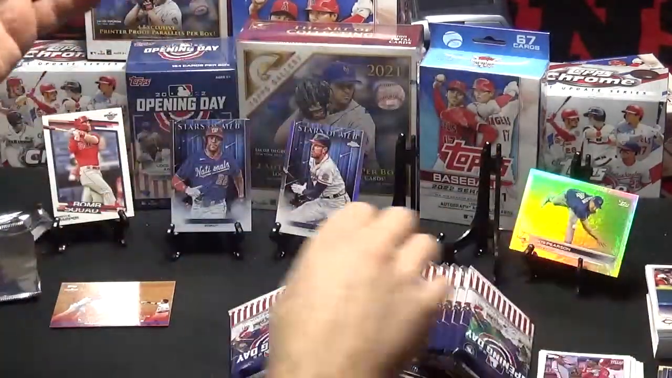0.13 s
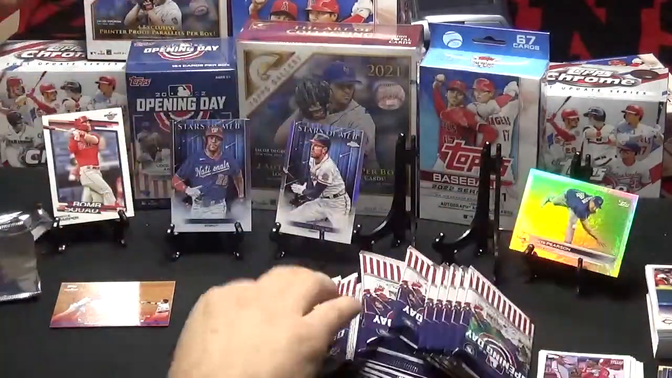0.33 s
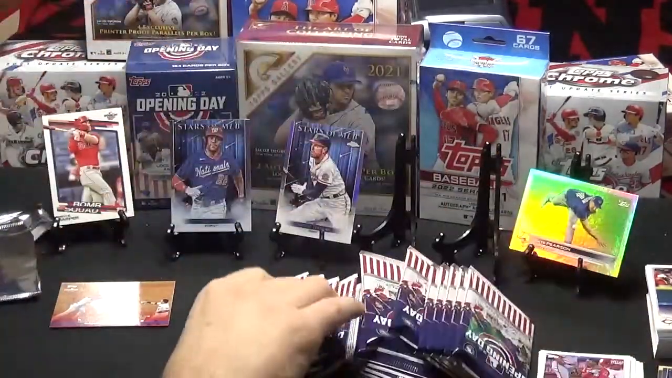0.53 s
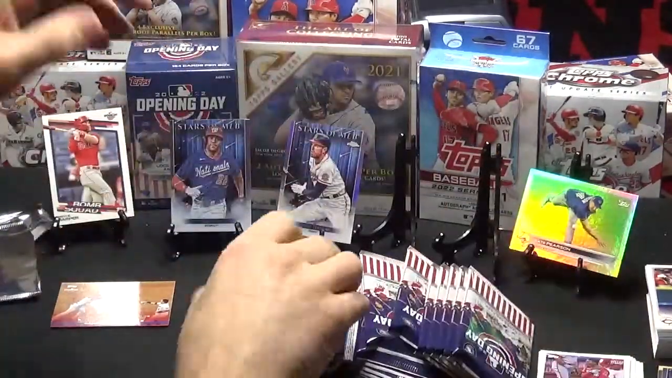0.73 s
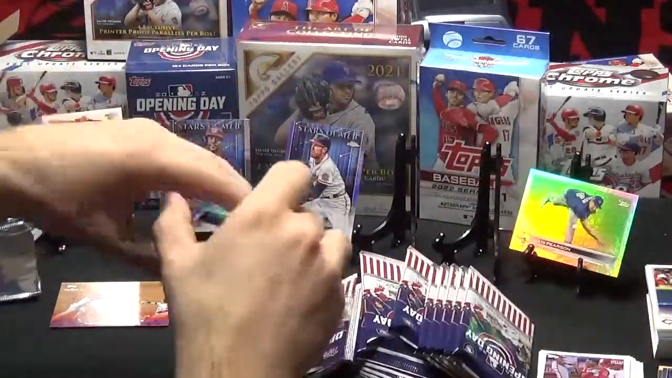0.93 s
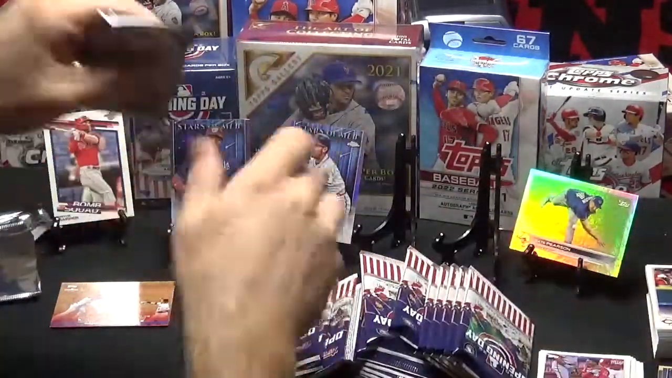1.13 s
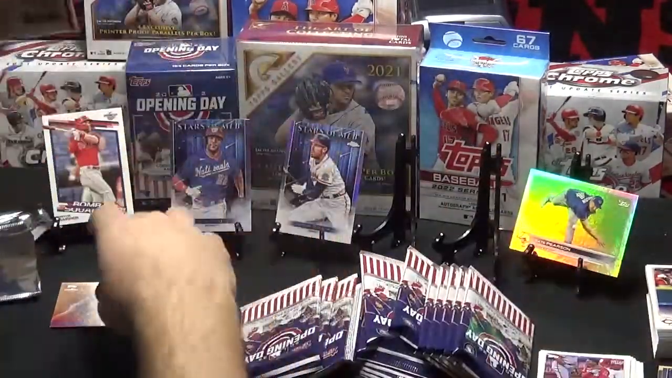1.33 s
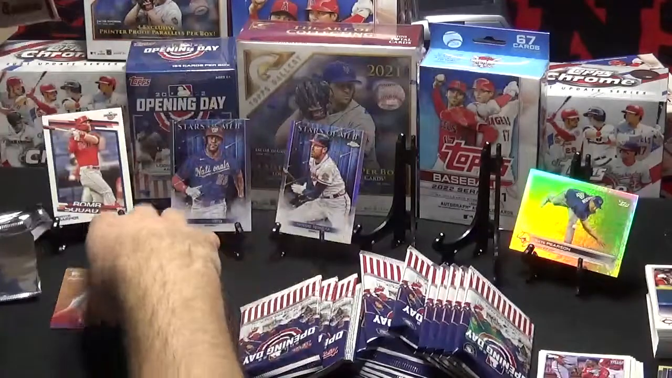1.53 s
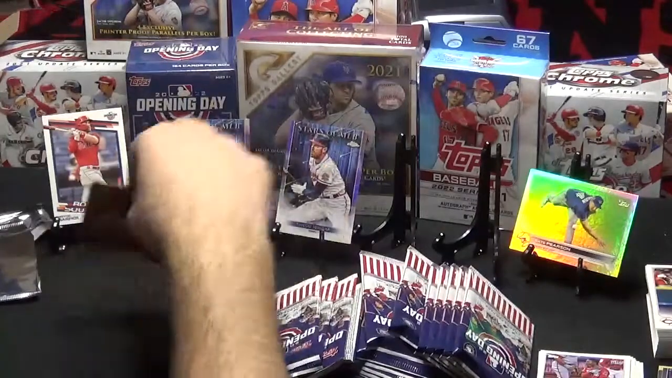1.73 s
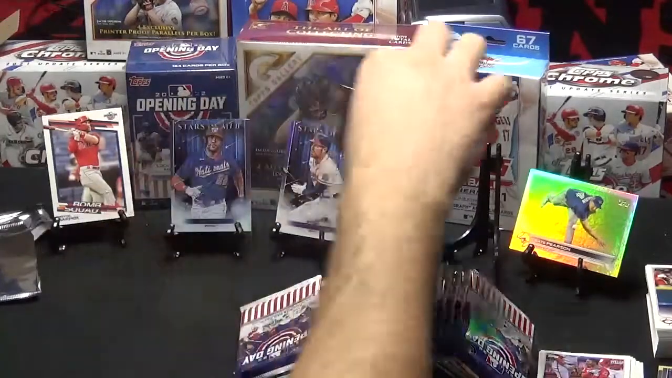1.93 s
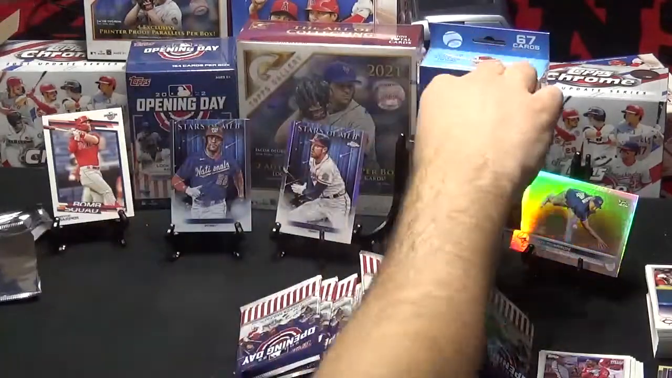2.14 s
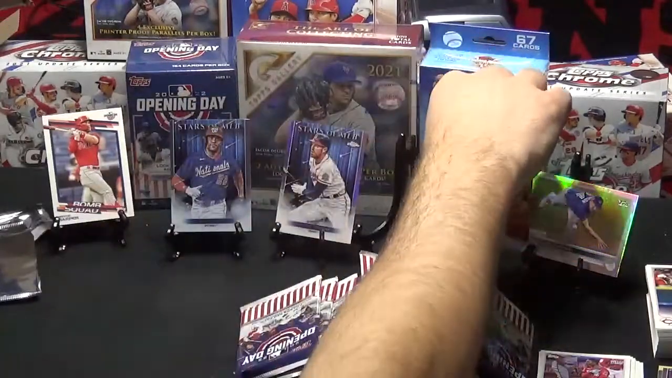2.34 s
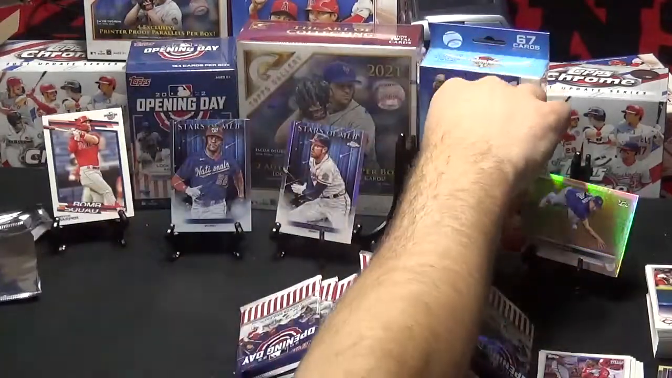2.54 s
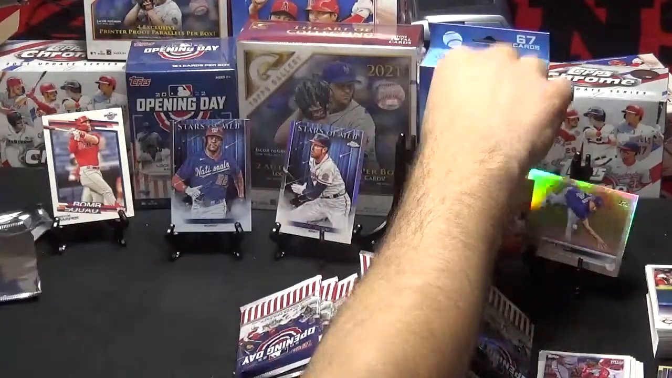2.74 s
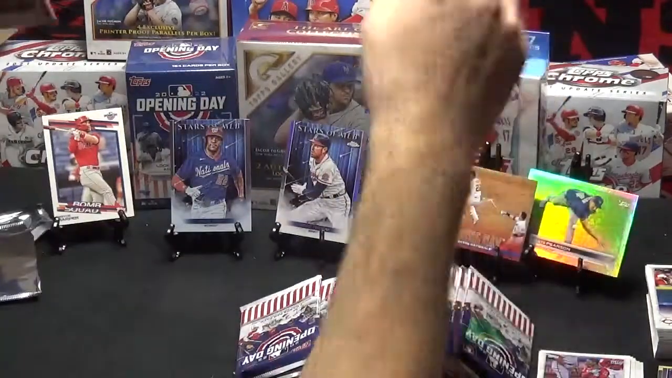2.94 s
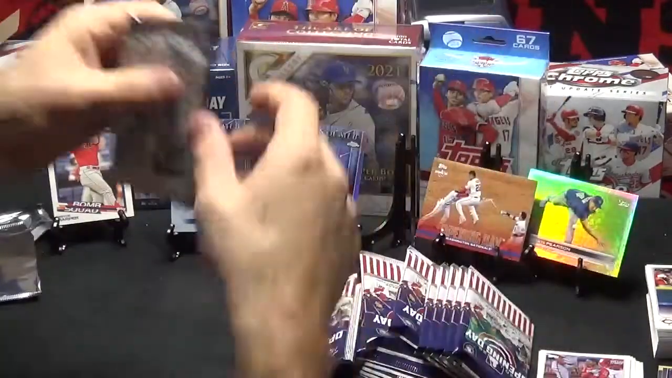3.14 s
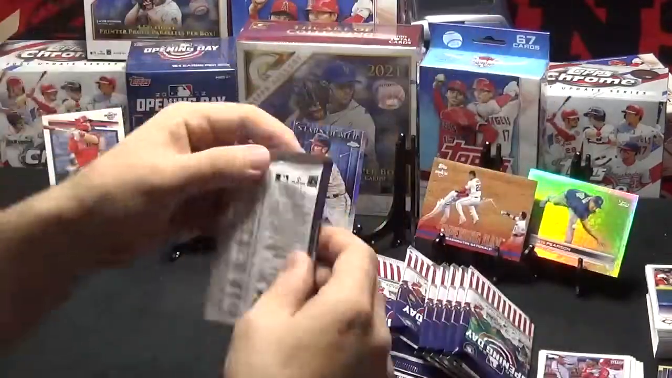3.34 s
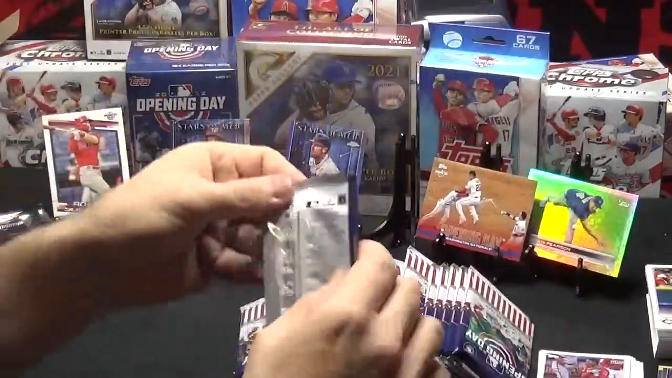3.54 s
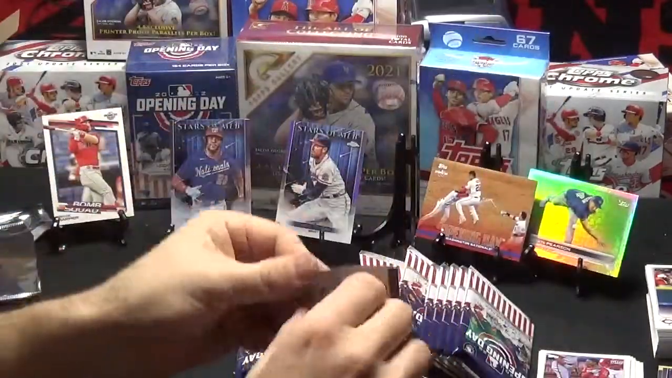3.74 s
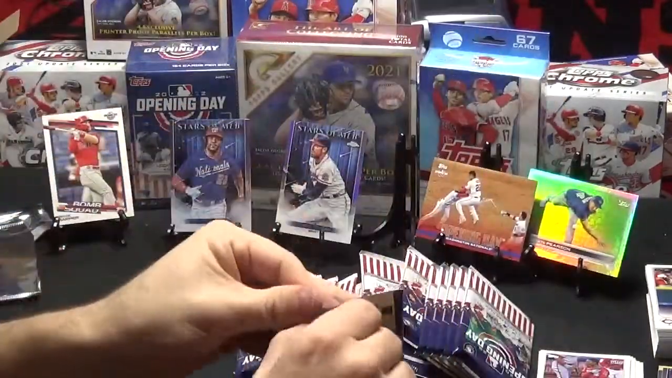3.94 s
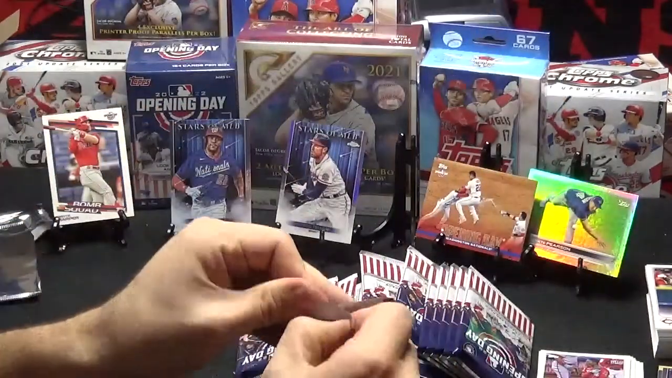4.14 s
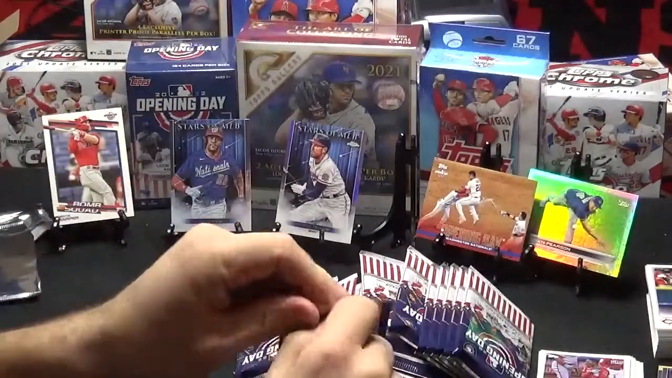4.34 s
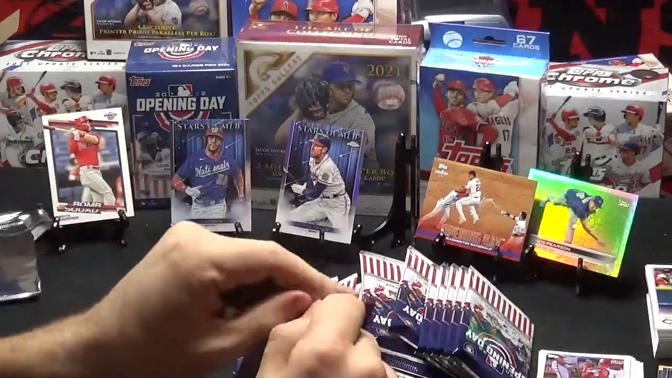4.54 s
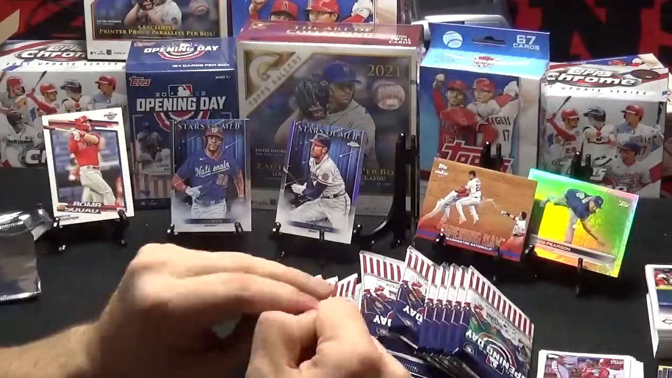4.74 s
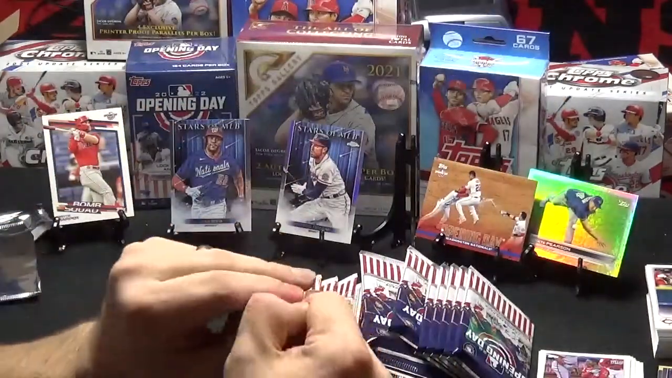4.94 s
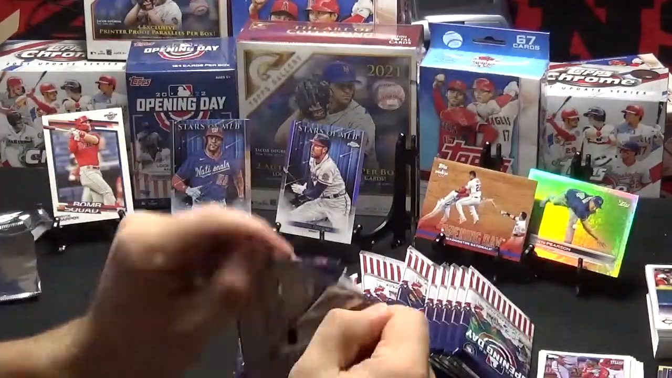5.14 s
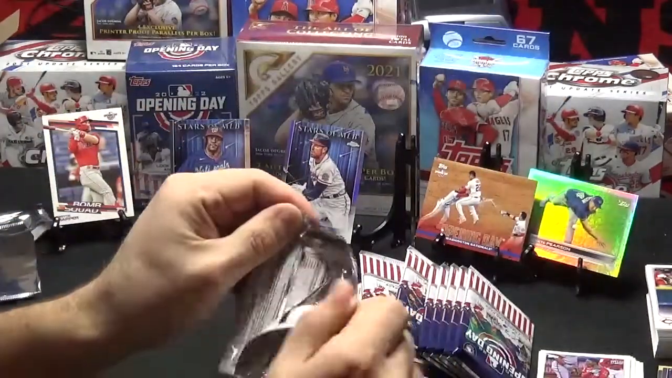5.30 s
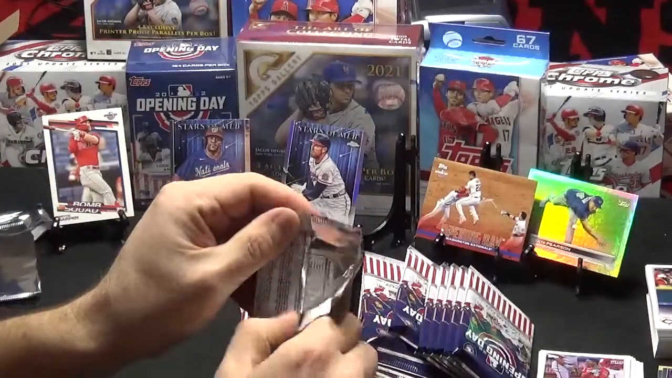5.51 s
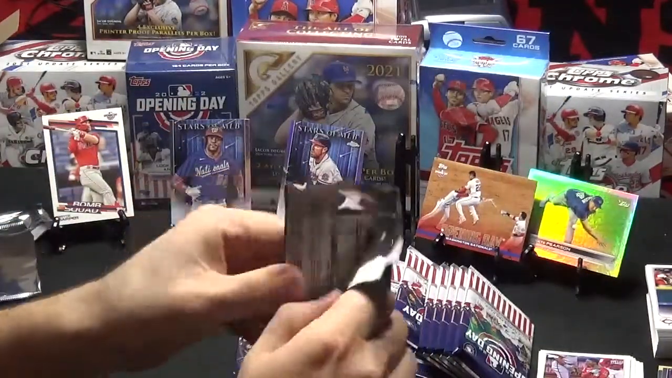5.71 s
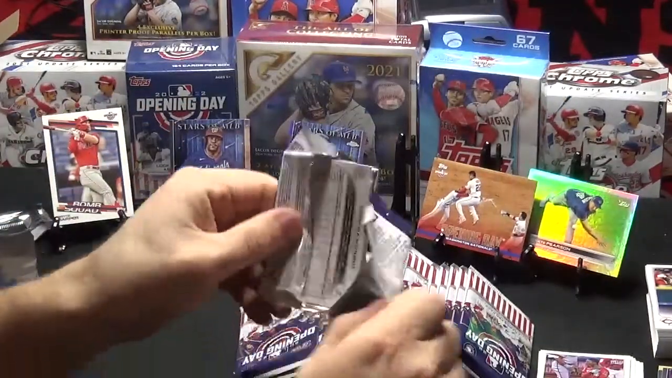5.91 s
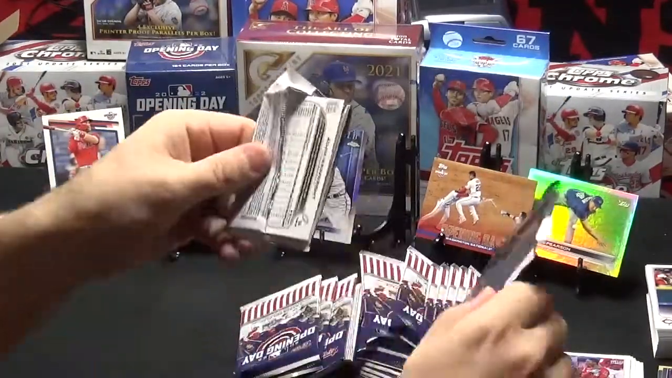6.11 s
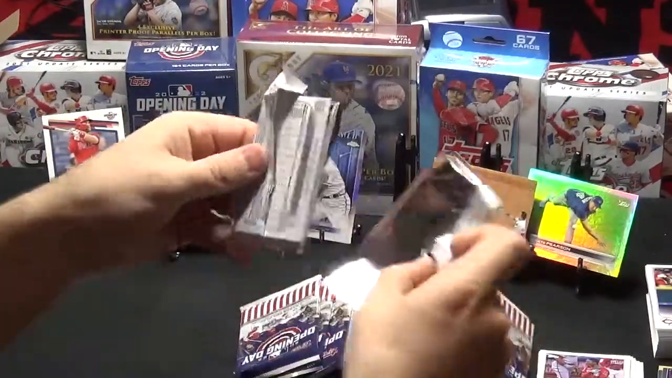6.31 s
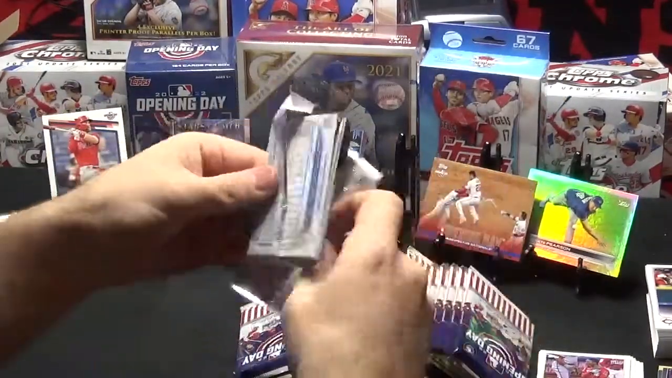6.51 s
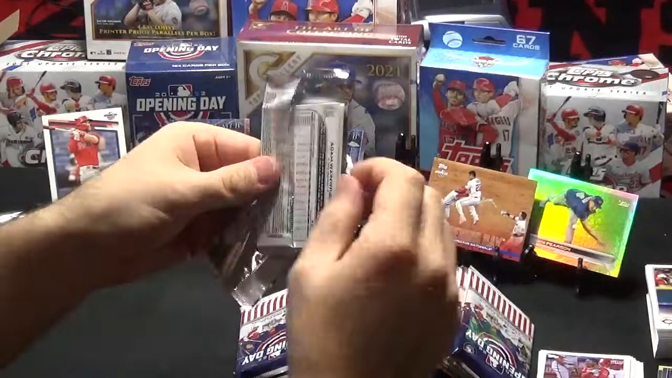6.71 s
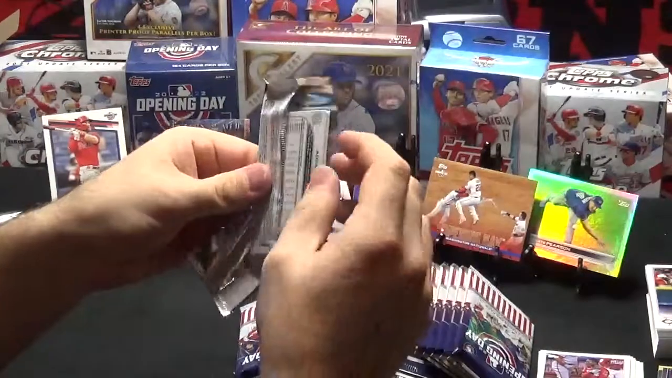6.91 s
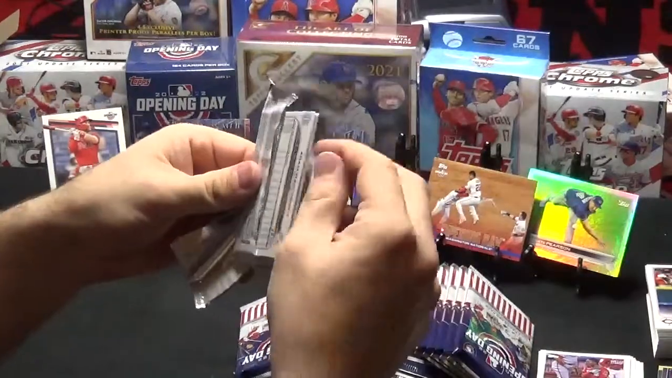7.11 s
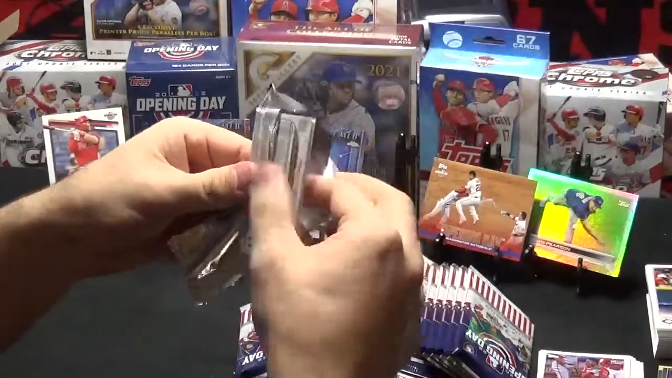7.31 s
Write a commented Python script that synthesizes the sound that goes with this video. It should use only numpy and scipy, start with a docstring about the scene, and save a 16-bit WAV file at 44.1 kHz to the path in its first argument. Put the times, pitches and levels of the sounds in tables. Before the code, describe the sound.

A small room, close microphone, low mains-like hum and soft airy hiss throughout. From 0 to about 3.2 seconds it is quiet: a thin high whine pulses rapidly, pausing around 0.9 to 1.15, with faint rubbing, a small foil snap and card knock near 1.0, and soft taps around 1.7 and 2.6 to 2.8. The whine stops at 3.2 as foil starts to crinkle, with isolated dry snaps to 3.7. From 3.7 to 5.0 crackling is dense, fine and bright, strongest near 4.1, easing around 4.6. At 5.0 to 5.25 the seam rips loudly, its bright edge sliding downward. Looser crinkles follow; at 5.8 to 6.0 the wrapper is stripped in a harsh crackling burst. Afterwards come separate crunches and sharp snaps, with dull card knocks near 6.2, 6.5 and 6.75, continuing to the end around 7.5. Short room reflections follow each snap.

```python
"""Foil card pack in two hands, close to a camera in a small room: picked up, pinched, ripped open, stripped.
Creases buckle in single snaps, made as kicked resonances; rubbing and tearing shed showers of tiny clicks
filtered in bands. Cards knock dully, and the room answers with short tails of decaying noise.
Behind lie shaped noise for air and wavering sines for an appliance; a faint pulsing whine sits near the mic."""
import sys
import numpy as np
from scipy import signal
from scipy.fft import rfft, irfft
from scipy.io import wavfile
from scipy.ndimage import uniform_filter1d

SR = 44100
rng = np.random.default_rng(int(sys.argv[2]) if len(sys.argv) > 2 else 0)


def output_pcm(signal):
    """Save a mono or channel-first signal as 16-bit PCM at the path in sys.argv[1].

    Samples are clipped to [-1, 1] before scaling.
    """
    pcm = np.clip(np.atleast_2d(signal).T, -1, 1) * 32767
    wavfile.write(sys.argv[1], SR, np.round(pcm).astype(np.int16))


N = 328986
TOP_HZ = 11020  # upper edge of what the camera keeps


def undb(db):
    """Decibels to gain."""
    return 10 ** (np.asarray(db) / 20)


def unit(x):
    """Scale to rms 1."""
    return x / np.sqrt(np.mean(x ** 2) + 1e-20)


def band(x, lo_hz, hi_hz, order=2):
    """Causal band-pass."""
    edges = [lo_hz, min(hi_hz, SR / 2 - 100)]
    sos = signal.butter(order, edges, "band", fs=SR, output="sos")
    return signal.sosfilt(sos, x + 1e-18)


def colour(points, hz):
    """Gain of a (f/Hz, level/dB) spectrum at the given frequencies."""
    f, db = np.transpose(points)
    return undb(np.interp(np.log(hz + 1), np.log(f), db))


def walk(rate):
    """Random drift around zero with rate knots a second, smoothed over 50 ms."""
    knots = rng.standard_normal(400)
    drift = np.interp(np.arange(N) / SR * rate, np.arange(len(knots)), knots)
    return uniform_filter1d(drift, SR // 20)


def curves(table):
    """The columns of a timed table, one value per sample; the end rows hold outside it."""
    s, *columns = np.transpose(table)
    return [np.interp(np.arange(N) / SR, s, c) for c in columns]


def add(out, s, sound):
    """Mix a sound in at a time."""
    i = int(np.clip(s * SR, 0, N - 1))
    out[i:i + len(sound)] += sound[:N - i]


def air(side_hz=900, side_share=0.93, level_db=-57):
    """Steady ventilation and hiss: shaped noise whose deep bass is nearly alike on both sides."""
    # density of the background air before overall scaling: f/Hz, level/dB per Hz
    air_points = [(20, -22), (35, -10), (55, -5.5), (95, 4), (150, 0.5), (200, 0.5), (300, -8.5),
                  (600, -12.5), (1200, -16.5), (2500, -17), (5000, -21), (11000, -24.5)]
    hz = np.fft.rfftfreq(N, 1 / SR)
    mid, side = rfft(rng.standard_normal((2, N))) * colour(air_points, hz)
    side = side * side_share * np.sqrt(hz / (hz + side_hz))
    left_right = irfft(np.array([mid + side, mid - side]), N)
    return undb(level_db) * unit(left_right)


def hum(waver_rate=5, lift_db=3):
    """Wavering motor and mains hum, heard a little louder as the gain on it is raised from 3 to 5 s."""
    # shaft, mains and casing lines: f/Hz, level/dB rms before the gain is raised, waver share
    hum_lines = [(30.2, -64, 0.25), (37.8, -74, .3), (83.5, -76.5, 1), (88, -65, 0.43), (120, -49.5, 0.067),
                 (202.5, -57.5, 0.37), (242, -88, 0.15)]
    t = np.arange(N) / SR
    out = 0
    for hz, db, waver in hum_lines:
        drift = 1 + waver * (walk(waver_rate) + 1j * walk(waver_rate))
        phasor = drift * np.exp(2j * np.pi * (hz * t + rng.random()))
        out = out + undb(db) * unit(phasor.real)
    return out * undb(lift_db * np.interp(t, [3.0, 5.0], [0, 1]))


def whine(pulse_s=0.0024, uneven_db=2.0, waver_rad=0.77):
    """Thin, slightly uneven pips at a fixed rate, like a small lens motor stepping near the mic."""
    # stretches of whine: start t/s, end t/s, f/Hz, pulses a second, level/dB rms of the ungated pip train
    whine_runs = [(0.014, .86, 3400, 30, -68.5), (0.014, .86, 2590, 30, -73.5), (1.151, 2.5, 2590, 30, -68),
                  (1.181, 3.2, 3450, 15, -76.5), (2.518, 3.15, 2590, 30, -78)]
    t = np.arange(N) / SR
    out = np.zeros(N)
    for start, end, hz, rate, db in whine_runs:
        from_pip = ((t - start) * rate + .5) % 1 - .5  # distance in pulse periods
        envelope = np.exp(-.5 * (from_pip / rate / pulse_s) ** 2)
        pips = envelope * np.sin(2 * np.pi * hz * t + waver_rad * walk(30.7))
        sounding = (t > start - 2 * pulse_s) * (t < end)
        out += undb(db) * unit(pips * undb(uneven_db * walk(11.77))) * sounding
    return out


def hands(push_range_db=20.5, grip_db_per_s=4000, let_go_db_per_s=900):
    """Work on the foil, its free flexing and fineness of creases, in dB; the strongest push or pull leads."""
    # finger pushes: hardest moment t/s, swell/s, fade/s, crackle level/dB,
    # finest creases against mid-sized facets level/dB
    finger_pushes = [(.414, .02, 0.29, -56.5, 7), (.58, 0.23, 0.15, -57, 10), (1.008, .007, .04, -41, 5.5),
                     (1.696, 0.063, 0.062, -52, -3), (3.22, 0.33, 0.32, -53, 2),
                     (3.39, 0.24, 0.26, -50.5, 5), (3.467, .02, 0.023, -39, 3),
                     (3.655, 0.12, 0.067, -47.5, 3), (3.742, 0.01, 0.043, -30.5, 5.5),
                     (3.905, 0.049, 0.043, -32.5, 24), (3.999, 0.038, 0.055, -25, 10.5),
                     (4.096, 0.046, 0.041, -20, 10.5), (4.193, .14, 0.086, -32.5, 11),
                     (4.25, 0.027, 0.057, -34, 8.5), (4.318, 0.017, 0.18, -31, 6.5),
                     (4.465, .015, 0.074, -36.5, -1), (4.578, 0.026, .06, -44.5, -1),
                     (4.66, 0.084, .13, -46, -9), (4.764, 0.026, .08, -33.5, 5.5),
                     (4.826, 0.011, 0.078, -27.5, 8.5), (4.905, 0.059, 0.16, -29.5, 12),
                     (4.96, .14, 0.051, -31.5, 11.5), (5.365, 0.046, .11, -36, 0),
                     (5.525, 0.0065, 0.19, -37, 5.5), (5.603, 0.043, 0.11, -39.5, -1.5),
                     (5.734, 0.022, 0.062, -35.5, 0), (6.252, 0.015, 0.22, -41.5, -2),
                     (6.29, 0.032, 0.049, -36.5, -5.5), (6.339, .06, 0.063, -42, -9),
                     (6.521, 0.041, 0.12, -33.5, -3.5), (6.568, 0.066, 0.057, -34, -1.5),
                     (6.737, 0.023, 0.043, -38, 1), (6.836, 0.011, 0.046, -38.5, 4),
                     (6.937, 0.017, .09, -36.5, 5.5), (7.144, .13, 0.058, -39.5, -0.5),
                     (7.436, 0.29, 0.039, -39, -1.5)]
    # ripping the seam: t/s, crackle level/dB, finest creases level/dB
    seam_pull = [(5.006, -25.5, 8), (5.042, -15.5, 1), (5.14, -27.5, 3.5), (5.154, -25, 2),
                 (5.198, -33, 3.5), (5.22, -28.5, 5.5), (5.26, -39, 9)]
    # stripping the wrapper: t/s, crackle level/dB, finest creases level/dB
    wrapper_pull = [(5.77, -39, 6), (5.776, -34, 6.3), (5.784, -37, 7.2), (5.79, -30.5, 6.1),
                    (5.902, -22, 2.6), (6.008, -23, 5.3), (6.015, -26.5, 5.7)]
    # slack, little when pinched taut, more when torn open: t/s,
    # whole-sheet flexing against mid-sized facets level/dB
    wrapper_slack = [(.4, -4), (3.4, -7.5), (3.65, -2), (3.75, -16.5), (4.1, -17.5), (4.8, -18),
                     (5.04, -19), (5.09, -13), (5.15, -15), (5.25, 2), (5.37, -7.5), (5.6, -4),
                     (5.82, -17.5), (5.89, -6), (6.02, -10), (6.5, -9.5), (7.45, -11.5)]
    t = np.arange(N) / SR
    work_db, fine_db = np.full(N, -100.), np.zeros(N)
    for s, swell_s, fade_s, db, fine in finger_pushes:
        # a push gains push_range_db over its swell and loses it over its fade
        push_db = db - push_range_db * np.maximum((s - t) / swell_s, (t - s) / fade_s)
        fine_db = np.where(push_db > work_db, fine, fine_db)
        work_db = np.maximum(work_db, push_db)
    for pull in (seam_pull, wrapper_pull):
        db, fine = curves(pull)
        taking_hold = grip_db_per_s * np.maximum(pull[0][0] - t, 0)
        letting_go = let_go_db_per_s * np.maximum(t - pull[-1][0], 0)
        pull_db = db - taking_hold - letting_go
        fine_db = np.where(pull_db > work_db, fine, fine_db)
        work_db = np.maximum(work_db, pull_db)
    return work_db, curves(wrapper_slack)[0], fine_db


def shower(rate, size_db):
    """Random impulses at a moving rate, mostly small, a few large."""
    hits = rng.random(N) < rate / SR
    sizes = hits * undb(size_db * np.minimum(rng.exponential(size=N), 4))
    # dividing by the local rms keeps the shower's loudness even; the work level sets it
    nearby = np.abs(uniform_filter1d(sizes ** 2, SR // 50))
    return sizes / np.sqrt(nearby + rate / SR / 2)


def crackle(work_db, sheet_db, fine_db, clicks_per_s=950, crowding=.55, size_db=3.5, facet_db=4,
            rub_share=0.093, slide_db=-53, flap_octaves=0.18, sheet_hz=1100, fine_hz=5000, count=16):
    """Tiny clicks, denser when the foil is worked harder; each shakes its own mix of large and small facets."""
    # colour of crackling foil: f/Hz, level/dB per Hz
    foil_points = [(250, -6), (450, -7.5), (720, -3), (950, -6.5), (1150, -7), (1550, 3.5), (2300, 2.5),
                   (4200, 3.5), (7000, -2), (11000, 4)]
    # seam rip, the freed flap grows so its resonance falls: t/s, flap f/Hz, emphasis level/dB
    seam_rip = [(4.995, 10000, -6), (5.008, 9200, 9), (5.035, 7760, 9.5), (5.06, 4300, 7.5),
                (5.085, 3030, 6), (5.11, 1720, 11), (5.15, 1670, 3.5), (5.225, 1680, 4.5), (5.27, 1600, -6)]
    flap_hz, flap_db = curves(seam_rip)
    clicks = shower(clicks_per_s * undb(crowding * (work_db + 32)), size_db)
    edges = np.geomspace(250, 11500, count + 1)
    centres = np.sqrt(edges[:-1] * edges[1:])
    # the whole sheet radiates the lows, mid-sized facets the middle, fine creases the top
    sheet = 1 / (1 + (centres / sheet_hz) ** 8)
    fine = 1 / (1 + (fine_hz / centres) ** 6)
    sizes = np.array([sheet, (1 - sheet) * (1 - fine), fine])
    shares = sizes * colour(foil_points, centres) ** 2 * centres
    shares = shares / shares.sum(axis=1, keepdims=True)
    drive = undb([sheet_db, np.zeros(N), fine_db]) ** 2
    # a light touch mostly slides over the foil with a smooth swish; a firm one buckles it
    sliding = np.clip(rub_share + 1 / (1 + undb(work_db - slide_db) ** 2), 0, 1)
    out, power = np.zeros(N), np.zeros(N)
    for lo, hi, hz, share in zip(edges[:-1], edges[1:], centres, shares.T):
        own_sizes = undb(facet_db * rng.uniform(-2, 2, N))
        buckling = unit(clicks * rng.choice([-1, 1], N) * own_sizes)
        push = np.sqrt(1 - sliding) * buckling + np.sqrt(sliding) * rng.standard_normal(N)
        flap = flap_db * np.exp(-.5 * (np.log2(hz / flap_hz) / flap_octaves) ** 2)
        gain = np.sqrt(share @ drive) * undb(flap)
        out += gain * unit(band(push, lo, hi))
        power += gain ** 2
    # dividing by the summed band power leaves the level to the hands
    return undb(work_db) * out / np.sqrt(power)


def click(hz, ring_s, grit, span, broad_db):
    """A kick and a dying rattle through one resonance and as a broad crack; energy of 1 ms at rms 1."""
    t = np.arange(SR // 20) / SR
    rattle = rng.standard_normal(len(t)) * np.exp(-t / (2 * max(ring_s, 1 / SR)))
    push = grit * unit(rattle) + unit(t == 0)
    ring = band(push, hz / (1 + span), min(hz * (1 + span), TOP_HZ))
    crack = band(push, hz / 3, min(hz * 4, TOP_HZ))
    return unit(unit(ring) + undb(broad_db) * unit(crack)) * np.sqrt(SR / 1000 / len(t))


def taps(grit=3.7, span=0.31, broad_db=-3):
    """Light, duller knocks of card and plastic: single kicks through a narrower resonance."""
    # cards against fingers, stands and table: t/s, level/dB as if packed into 1 ms,
    # main resonance f/Hz, ring time/s
    card_knocks = [(0.413, -47, 1470, 0.0051), (1.011, -45, 655, 0.0027), (1.024, -38, 462, 0.0052),
                   (1.667, -41.5, 1900, 0.0019), (1.689, -40.5, 595, 0.0069), (1.713, -54, 1100, 0.0043),
                   (2.579, -51, 3900, 0.0051), (2.585, -53, 1400, .004), (2.655, -49, 1300, 0.0052),
                   (2.793, -41.5, 1170, 0.0014), (2.797, -44.5, 1370, 0.012), (6.19, -36.5, 570, 0.0072),
                   (6.504, -28, 920, 0.0027), (6.522, -29, 960, 0.0045), (6.738, -32.5, 193, 0.0057),
                   (7.0943, -38, 1210, 0.0024)]
    out = np.zeros(N)
    for s, db, hz, ring_s in card_knocks:
        add(out, s, undb(db) * click(hz, ring_s, grit, span, broad_db))
    return out


def snaps(creases, grit=1.78, span=0.77, broad_db=-7, sheet_hz=1300, sheet_span=1.0):
    """Each crease flips over at once, shakes the facet beside it and, more dully, the whole sheet."""
    out = np.zeros(N)
    for s, db, hz, ring_s, sheet_db in creases:
        facet = click(hz, ring_s, grit, span, broad_db)
        sheet = click(sheet_hz, ring_s, grit, sheet_span, broad_db)
        add(out, s, undb(db) * (facet + undb(sheet_db) * sheet))
    return out


def lesser_creases(work_db, sheet_db, count=300, yield_db=-50, per_s=20, over_db=10.5, top_db=-28,
                   scatter_db=5, centre_hz=6400, octaves=0.18, ring_s=0.00032, flex_db=-9.5):
    """Rows for snaps(): creases give way at random above the yield level, stronger under harder work."""
    rows, s = [], 0
    for gap, size, facet in rng.standard_normal((count, 3)):
        s += np.exp(gap / 2) / per_s
        i = int(s * SR)
        if i < N and work_db[i] > yield_db:
            # top_db caps the typical level; the scatter comes on top
            db = min(work_db[i] + over_db, top_db) + scatter_db * size
            hz = centre_hz * 2 ** (octaves * np.clip(facet, -2, 2))
            rows.append((s, db, hz, ring_s, sheet_db[i] + flex_db))
    return rows


def echoes(build_s, count=12, t60_low_s=0.57, t60_high_s=0.25):
    """One dense room tail of unit energy: bands of decaying noise whose treble dies first."""
    t = np.arange(SR // 2) / SR
    edges = np.geomspace(200, 12000, count + 1)
    tail = np.zeros(len(t))
    for lo, hi, t60 in zip(edges[:-1], edges[1:], np.linspace(t60_low_s, t60_high_s, count)):
        fade = np.exp(-np.log(1000) * t / t60) * (1 - np.exp(-t / build_s))
        tail += np.sqrt(hi - lo) * unit(band(rng.standard_normal(len(t)), lo, hi) * fade)
    return tail / np.linalg.norm(tail)


def room(upward, sideways, level_db=-7, side_db=-3, side_low_hz=450, side_top_hz=7000,
         build_s=0.00017, hand_turn=2.09):
    """Table and walls answer; the echo pattern keeps changing as the hands move."""
    one = signal.fftconvolve(upward, echoes(build_s))[:N]
    other = signal.fftconvolve(sideways, echoes(build_s))[:N]
    angle = hand_turn * walk(4)  # radians
    mid = np.cos(angle) * one + np.sin(angle) * other
    # long waves reach both microphone ports alike
    side = np.cos(angle) * other - np.sin(angle) * one
    side = band(side, side_low_hz, side_top_hz, order=1)
    return undb(level_db) * (mid + undb(side_db) * side * np.array([[1], [-1]]))


def limiter(x, threshold_db=-16, release_db_per_s=50, ceiling=.48):
    """Turns both sides down at once when loud, recovers steadily, and rounds spikes that slip through."""
    power = np.abs(uniform_filter1d(np.mean(x ** 2, axis=0), SR // 400))
    over_db = np.maximum(10 * np.log10(power + 1e-12) - threshold_db, 0)
    recovery = release_db_per_s * np.arange(N) / SR
    cut_db = np.maximum.accumulate(over_db + recovery) - recovery
    held = x * undb(-cut_db)
    return held / (1 + (held / ceiling) ** 6) ** (1 / 6)


def scene():
    """Foil and taps in the middle, close to the mic, with the room and background around them."""
    # the loudest buckling creases: t/s, level/dB as if packed into 1 ms, facet centre f/Hz,
    # ring time/s, flexing of the surrounding sheet level/dB against the facet
    loud_creases = [(.488, -40, 7500, .0008, -5), (.973, -45, 4100, .0015, -3.5),
                    (1.011, -25, 6260, 0.0035, -25), (1.022, -22, 5000, 0.0017, -14.5),
                    (3.212, -33, 6300, 0.00022, -20), (3.2196, -30.5, 6540, .0009, -29),
                    (3.3756, -22, 7200, 0.0023, -38), (3.41, -27.5, 6400, 0.00081, -11),
                    (3.463, -31.5, 4400, 0.00062, -14), (3.595, -33.5, 5600, .0006, -17),
                    (3.6145, -22.5, 6900, 0.00094, -30), (3.622, -24.5, 5700, 0.0015, -25),
                    (3.637, -25, 6600, 0.00069, -20), (3.6536, -22, 7200, .0002, -16),
                    (3.670, -26.5, 5460, 0.00086, -11), (3.735, -20, 5350, 0.0036, -15),
                    (3.747, -18.5, 7460, 0.0006, -35), (3.762, -25, 5500, 0.00071, -30),
                    (3.8253, -28.5, 7300, 0.0012, -32), (3.904, -19, 9800, .0006, -41),
                    (3.977, -14, 8300, 0.002, -35), (4.082, -17, 7600, 0.00087, -29),
                    (4.198, -18.5, 8050, 0.00017, -34.5), (4.3125, -22.5, 6030, 0.0015, -23),
                    (4.3245, -16, 6400, 0.0013, -40), (4.401, -21, 4770, 0.001, -14),
                    (4.4585, -19.5, 8850, 0.00094, -21), (4.470, -19.5, 6000, 0.00089, -31),
                    (4.5944, -25.5, 5350, 0.00059, -14), (4.639, -25, 6300, .0007, -14.5),
                    (4.659, -28, 5980, 0.00044, -20), (4.683, -28, 8400, 0.00022, -30),
                    (4.716, -31.5, 3800, .0005, -8), (4.750, -30, 5340, 0.0019, -28),
                    (4.762, -25, 7100, 0.0011, -27), (4.777, -17, 3600, 0.001, -23),
                    (4.8245, -18.5, 6200, 0.0012, -27), (4.835, -21, 3900, 0.0015, -28.5),
                    (5.005, -15.5, 8800, .0008, -16), (5.078, -10.5, 4450, 0.00032, -7),
                    (5.1134, -14.5, 2030, 0.00028, -15), (5.155, -7.5, 7250, 0.0015, -27),
                    (5.3145, -26.5, 5100, 0.0004, -2.5), (5.3624, -17, 4600, 0.00052, -27.5),
                    (5.4246, -27, 6610, 0.0011, -14), (5.5796, -19.5, 6700, 0.00043, -25),
                    (5.603, -25.5, 6860, 0.00098, -14), (5.710, -27, 3430, .0002, -35),
                    (5.7386, -25.5, 5100, .0004, -22), (5.7923, -10.5, 7150, 0.00026, -38),
                    (5.816, -13, 6450, 0.00055, -10), (5.832, -12, 5300, 0.001, -12.5),
                    (5.882, -8.5, 6730, 0.0036, -4.5), (6.006, -17.5, 7940, .0007, -4),
                    (6.292, -22.5, 6600, 0.00093, -9), (6.331, -27, 3350, 0.0005, -1),
                    (6.52, -15.5, 7850, .0006, -11), (6.526, -17.5, 6300, 0.00036, -36),
                    (6.566, -15, 6760, 0.00065, -11.5), (6.603, -22, 4400, .0002, -35),
                    (6.738, -23, 5700, 0.0025, -11.5), (6.932, -26, 7670, 0.00028, -24),
                    (6.941, -23.5, 6800, .0013, -10), (7.07, -26.5, 5050, 0.0022, -24.5),
                    (7.139, -16.5, 6800, 0.0028, -19), (7.295, -28.5, 3990, 0.0012, -18),
                    (7.419, -15.5, 5170, 0.00031, -19), (7.456, -22, 7800, 0.0013, -15)]
    work_db, sheet_db, fine_db = hands()
    background = air() + hum() + whine()
    handling = crackle(work_db, sheet_db, fine_db) + taps()
    handling = handling + snaps(lesser_creases(work_db, sheet_db))
    # a loud buckling crease sounds a little different in every direction
    forward, upward, sideways = (handling + snaps(loud_creases) for _ in range(3))
    return forward + room(upward, sideways) + background


def record(dry):
    """The camera limits the loudest peaks and cuts the top steeply."""
    lowpass = signal.ellip(10, .2, 70, TOP_HZ, fs=SR, output="sos")
    return signal.sosfilt(lowpass, limiter(dry))


dry = scene()
out = record(dry)
output_pcm(out)
```